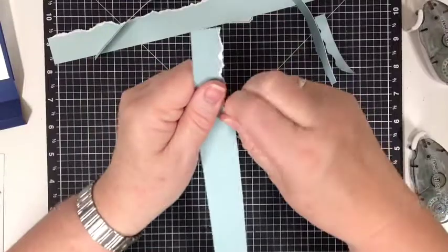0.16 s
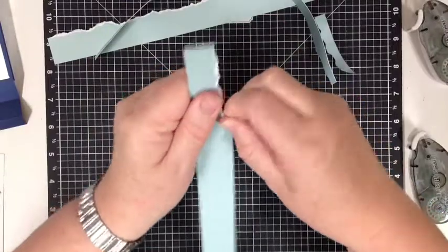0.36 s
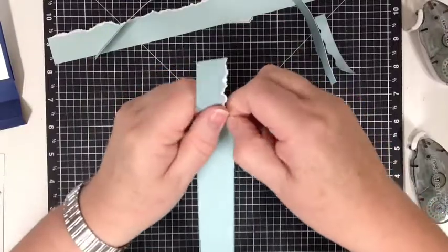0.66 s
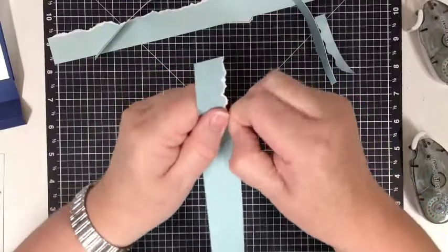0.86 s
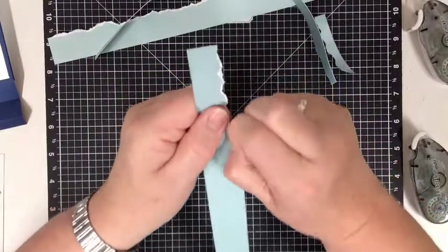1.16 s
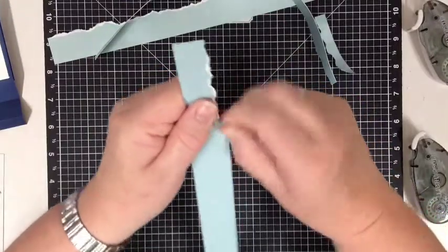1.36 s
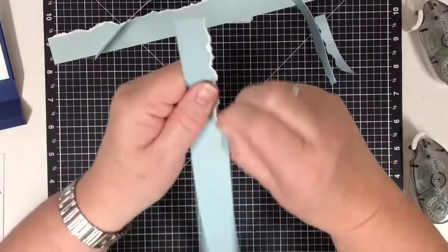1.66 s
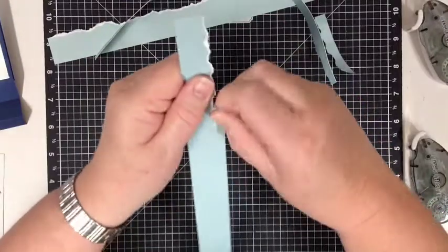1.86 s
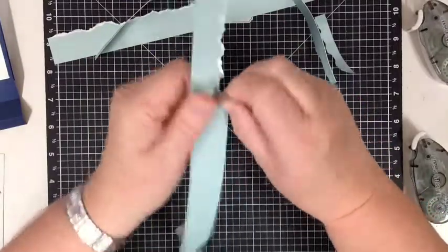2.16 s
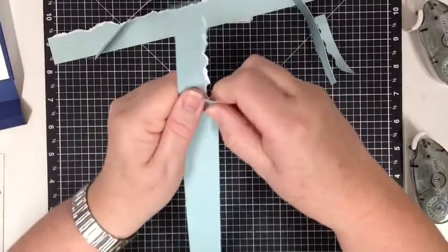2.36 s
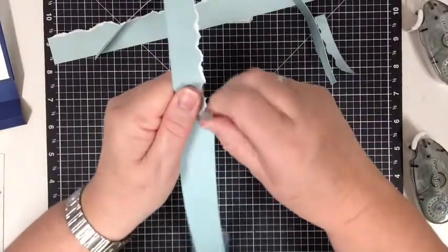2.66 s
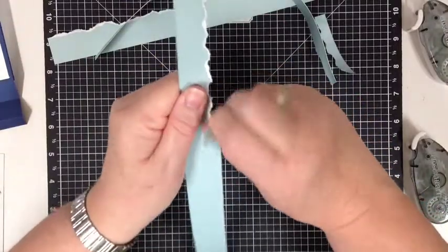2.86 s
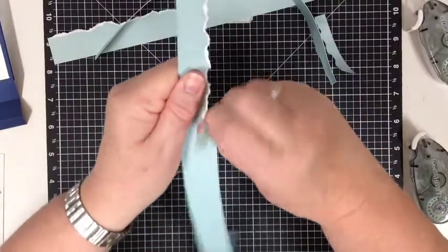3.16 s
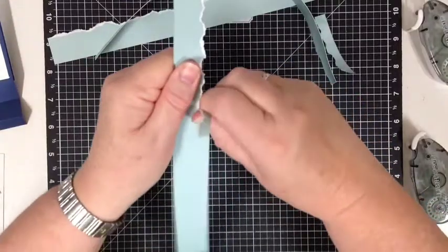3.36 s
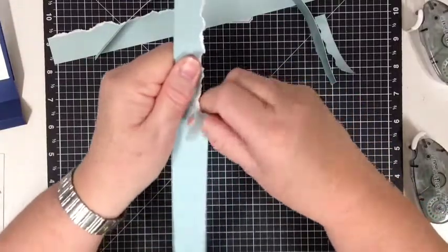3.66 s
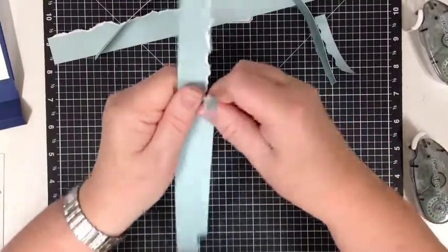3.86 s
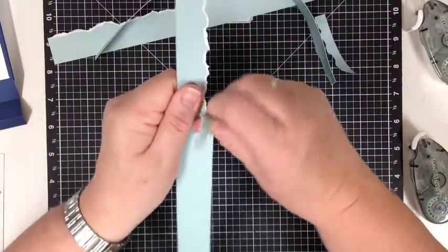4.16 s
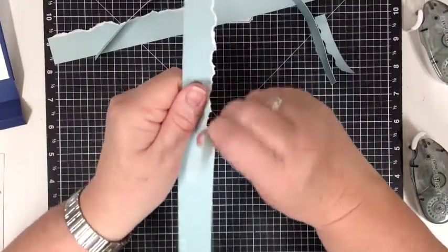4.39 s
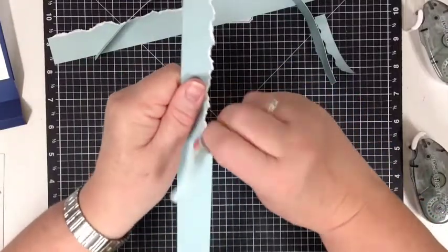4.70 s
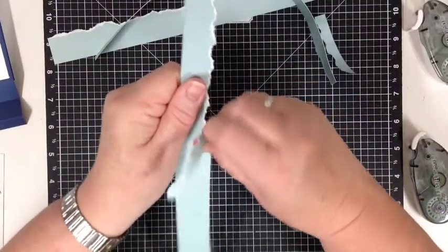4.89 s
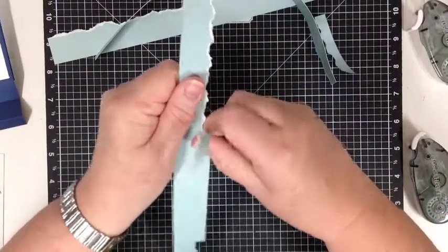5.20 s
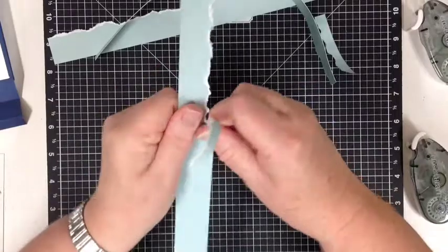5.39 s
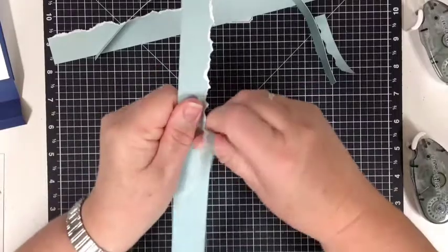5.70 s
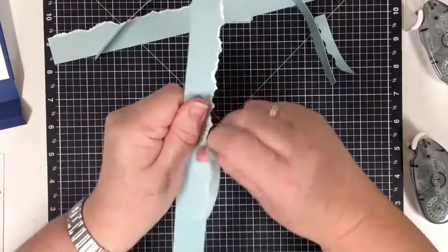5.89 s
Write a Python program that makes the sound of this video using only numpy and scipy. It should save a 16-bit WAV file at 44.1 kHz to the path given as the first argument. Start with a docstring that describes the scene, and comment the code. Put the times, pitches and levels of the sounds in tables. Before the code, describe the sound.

Close to the microphone in a small, fairly dry room, hands tear a stiff strip of card bit by bit. After a second of faint skin rubs and ticks, short crackling rips begin, each a tiny burst topped by sharp snaps. Between them fingers slide and tap softly while regripping. Later tears come regularly and grow snappier, over faint hiss and hum.

```python
"""Two hands tear a ragged edge along a strip of cardstock, a pinch at a time, over a craft table in a small room.
Each tear is a burst of random tiny clicks (breaking fibres), coloured by the stiff strip, with sharp snaps added.
Fingers slide along the card with a finer hiss (one brief small tear is made the same way) and tap it as short
damped tones; the bent strip ticks at random. Short noise echoes make the room.
Under it all lie faint filtered noise, a wavering hum and a low drone.
"""
import sys
import numpy as np
from scipy import signal
from scipy.fft import rfft, irfft
from scipy.io import wavfile
from scipy.ndimage import uniform_filter1d

SR = 44100
rng = np.random.default_rng(int(sys.argv[2]) if len(sys.argv) > 2 else 0)


def digitize_waveform(pressure):
    """Quantize a signal to 16-bit integers and store it at the path in sys.argv[1].

    Rows of a 2-D input are taken as channels; values are limited to [-1, 1].
    """
    field = np.atleast_2d(pressure).T
    bounded = np.clip(field, -1, 1)
    quanta = np.round(bounded * 32767).astype(np.int16)
    wavfile.write(sys.argv[1], SR, quanta)


N = 266364  # length of the scene [samples]
TOP_HZ = 15450  # upper limit of the sound


def tearing(gain_db=1.78):
    """The tear front runs through the fibres: coarse, bursty crackle."""
    # tears: (start [s], length [s], final crackle level before gain_db [dB], build-up [dB],
    # body relative to crackle [dB], treble tilt [dB per octave], low flex [dB], flap resonance [Hz])
    tears = [ (1.246, 0.066, -55.5, -9, -16, 5, -7, 1280),
             (1.568, 0.09, -34.5, 19.5, -16, -1.5, -1.5, 1440), (1.97, 0.039, -38, 2, -15, 1.5, 1.5, 1190),
             (2.452, 0.13, -43, 12.5, -17, -.5, 3.5, 1240), (2.861, 0.048, -43, 4.5, -8, 2, -1, 2480),
             (3.137, 0.066, -33.5, 10, -8, 1.5, 4, 2210), (3.444, 0.045, -38.5, 10, -6.5, -.5, 1, 1660),
             (4.016, 0.067, -47.5, -2, -16.5, 3, 10.5, 1970), (4.322, 0.057, -35.5, 3, -7.5, 2, -0.5, 2300),
             (4.637, 0.083, -39, 7, -7, 1.5, 1.5, 2300), (4.94, 0.065, -41, -7.5, -8, 1.5, 4, 1400),
             (5.534, 0.054, -47, -8, -15.5, 3.5, 5, 2740), (5.827, 0.07, -37, -1, -9.5, 0.5, -1.5, 1840), ]
    # broad colour of tearing: (frequency [Hz], level [dB])
    tear_colour = [(70, -52), (230, -24), (330, -13), (520, -10), (720, -9), (850, -14), (1250, -11),
                   (2200, -5), (3500, -3.5), (5000, -1), (8000, 0), (11000, .5), (13500, 0), (15500, -3)]
    out = np.zeros(N)
    grain = dict(per_s=2800, spread_db=3.9, burst_db=2.2, burst_s=.003, hiss=.42)
    for row in tears:
        start_s, sound = stroke(row, attack_db_per_s=865, release_db_per_s=560, colour=tear_colour,
                                strip_share=0.97, scatter_db=3.0, **grain)
        add(out, start_s, sound)
    return out * undb(gain_db)


def snapping(gain_db=-1.0, cycles=0.76, crumble=0.38, crumble_s=0.0019):
    """A bundle lets go with one short crack, its neighbours crumble after it, and the strip rings."""
    # fibre bundles that snap and edges that flick:
    # (time [s], level before gain_db [dB], centre frequency [Hz])
    snaps = [(0.043, -46, 4100), (.8002, -60, 2500), (1.182, -49, 9500), (1.248, -45.5, 10700),
             (1.2722, -44, 12200), (1.6283, -27.5, 7100), (1.659, -50, 6550), (1.761, -45, 2600),
             (2.094, -37.5, 3600), (2.2258, -35.5, 6700), (2.4227, -47.5, 8900), (2.4955, -42, 9100),
             (2.8013, -40.5, 9100), (2.8446, -37.5, 9600), (2.8752, -40, 9100), (2.9285, -37.5, 6600),
             (2.9993, -48, 3700), (3.1328, -40, 9700), (3.1859, -27, 7400), (3.194, -30, 7100),
             (3.207, -25, 5800), (3.3057, -52, 3900), (3.4252, -43, 5450), (3.5166, -32, 8300),
             (4.0118, -40, 10600), (4.0565, -25.5, 10700), (4.0873, -42, 8540), (4.1826, -51, 8400),
             (4.298, -43, 6300), (4.3252, -30, 5800), (4.3878, -26.5, 6300), (4.4792, -52.5, 3860),
             (4.594, -43.5, 11200), (4.614, -50, 8500), (4.6409, -34.5, 2800), (4.6736, -28.5, 3800),
             (4.9188, -33, 5940), (4.9391, -27, 4600), (4.971, -23.5, 5550), (5.0108, -32, 7200),
             (5.247, -43, 3040), (5.5282, -27.5, 8700), (5.8061, -29, 10600), (5.8143, -20, 3520),
             (5.8399, -30, 6900), (5.8954, -25, 6860), (5.9729, -46, 7200)]
    out = np.zeros(N)
    t = np.arange(SR // 50) / SR
    strip = ring(strip_db(freqs(2048)))
    for s, db, hz in snaps:
        # the crack fades over a fixed fraction of a cycle, so high cracks are shorter
        crack = np.exp(-t * hz / cycles) * np.cos(2 * np.pi * hz * t)
        noise = band(rng.standard_normal(len(t)), hz / 3, hz * 2, order=1)
        after = unit(noise) * np.exp(-t / crumble_s)
        snap = signal.fftconvolve(crack + crumble * after, strip)
        # thin bundles snap high and move too little card to make any bass
        snap = band(snap, hz / 4, 17000, order=2)
        # the level is set by the first millisecond
        add(out, s, snap / np.std(snap[:SR // 1000]) * undb(db + gain_db))
    return out


def sliding(gain_db=0.74):
    """Skin rubs along the card, with one brief small tear: much finer grains that merge into an even hiss."""
    # slides to a new grip, and one brief small tear at 2.227 s:
    # (start [s], length [s], final hiss level before gain_db [dB], build-up [dB],
    # body relative to hiss [dB], treble tilt [dB per octave], low flex [dB], flap resonance [Hz])
    slides = [ (0.02, 0.023, -55.5, -8, -4, -2.5, -1, 3500), (0.344, 0.056, -53.5, 4.5, -6, -4, 6, 1380),
              (0.451, 0.1, -52.5, -2, -21, 0, -16, 1130), (0.602, .025, -61.5, -0.5, -11, 0, -7, 1130),
              (0.693, 0.04, -52.5, -4, -10.5, -1, -17, 2950), (0.837, 0.13, -64, 1.5, -8, -4.5, 10, 1150),
              (1.042, 0.0063, -56.5, -4.5, -12.5, 0.5, -8, 1580),
              (1.096, 0.037, -50.5, 4, -19, 5.5, -4, 1580),
              (1.384, 0.0051, -55.5, -4, -12.5, -2.5, 11, 1420),
              (1.431, 0.016, -50, 8, -11.5, -2.5, 7, 1410), (1.53, 0.079, -51, 1.5, -12, 2.5, 3, 1370),
              (1.766, 0.018, -44, 4, -6, -5, -8, 1590), (1.889, 0.078, -53.5, -3, -8, 2, -15, 1540),
              (2.069, 0.14, -53, 4.5, -13.5, -2, 1, 1120), (2.227, 0.013, -41, 0.5, -3.5, 0, -3, 1260),
              (2.276, 0.025, -54.5, 3, -11, -10, 8.5, 1250), (2.348, 0.0092, -53, 1, -10, -3, 10, 1240),
              (2.695, 0.023, -44, 7, -12, -3.5, 3, 3540), (2.803, 0.009, -44.5, -0.5, -22, 1, -12, 3560),
              (3.003, 0.039, -52.5, 4, -7, -2.5, 0, 2300), (3.066, 0.046, -60.5, -4, -4.5, 2, 0, 1300),
              (3.312, 0.042, -54.5, 2.5, -5, -1, 9, 2250), (3.388, 0.0064, -48.5, -3.5, -17, 2.5, 3, 1580),
              (3.617, 0.042, -48.5, -0.5, -4.5, -2, 0.5, 2180),
              (3.742, 0.13, -45.5, 9, -14, -2.5, 5.5, 1940), (3.973, 0.063, -52.5, 0, -28, 0, 17, 1950),
              (4.202, 0.032, -52, 11, -9.5, -3, 8, 2510), (4.485, 0.02, -55.5, 0.5, -8.5, -4, 14, 2350),
              (4.533, 0.011, -47.5, -1, -14, 2, 2, 2360), (4.8, .062, -55, 6, -4.5, -2.5, 7.5, 1720),
              (5.072, 0.043, -59.5, -6, -10.5, -2, 1, 2300), (5.146, 0.029, -49.5, 3, -6.5, -3.5, 2, 2170),
              (5.26, 0.13, -39.5, 8.5, -16, 0.5, 6, 4860), (5.464, 0.0096, -60, -3.5, -14, -2.5, 17, 2720),
              (5.701, 0.0079, -39.5, 2.5, -7.5, -5, 3.5, 2140), (5.724, 0.018, -51, 13, -22, -6, 3, 2170),
              (5.98, 0.065, -58.5, -2.5, -6.5, -4, 6, 5740), ]
    # broad colour of sliding: (frequency [Hz], level [dB])
    slide_colour = [(70, -40), (220, -24.5), (340, -10), (520, -9.5), (850, -18), (1300, -9.5),
                    (2200, -6.5), (3500, -3), (8000, 3.5), (15500, 6)]
    out = np.zeros(N)
    grain = dict(per_s=12000, spread_db=2.8, burst_db=1.2, burst_s=.007, hiss=.8)
    for row in slides:
        start_s, sound = stroke(row, attack_db_per_s=817, release_db_per_s=421, colour=slide_colour,
                                strip_share=0.46, scatter_db=2.5, **grain)
        add(out, start_s, sound)
    return out * undb(gain_db)


def stroke(row, attack_db_per_s, release_db_per_s, colour, strip_share, scatter_db, **grain):
    """One hand movement: grains sound through the strip, with its own flap pitch and fine ripple."""
    s, length, level_db, build_db, body_db, tilt_db, flex_db, flap_hz = row
    first, last = int(max(s - .05, 0) * SR), int((s + length + .12) * SR)
    t = np.arange(first, last) / SR

    # the level sets in, changes steadily while the hand moves, and dies away when it stops
    effort_db = np.interp(t, [s, s + length], [level_db - build_db, level_db])
    effort_db -= attack_db_per_s * np.maximum(s - t, 0)
    effort_db -= release_db_per_s * np.maximum(t - s - length, 0)

    hz = freqs(2048)
    db = colour_db(colour, hz)
    db += tilt_db * np.log2(np.maximum(hz / 3500, 1))  # only above 3500 Hz
    db += flex_db / (1 + (hz / 850) ** 6)  # mostly below 850 Hz
    db += strip_share * strip_db(hz)
    db += 5 / (1 + (np.log(hz / flap_hz) / .11) ** 2)  # 5 dB lift at the resonance of the free flap
    # reflections off the hands ripple the spectrum finely
    db += scatter_db * wander(np.log(hz + 1500), .018)

    grains = fibres(np.arange(SR // 2) / SR, **grain)
    sound = signal.fftconvolve(grains, ring(db))[:len(t)]
    # the treble comes straight from the fibres, the body from the bending card
    low = irfft(rfft(sound) / (1 + (freqs(len(t)) / 3300) ** 8), len(t))
    body = low / np.std(band(low, 900, 3300))
    treble = unit(sound - low)
    return t[0], (treble + body * undb(body_db)) * undb(effort_db)


def fibres(t, per_s, spread_db, burst_db, burst_s, hiss):
    """Tiny breaks of very uneven size; they come in bursts as the card catches and gives."""
    n = len(t)
    size = undb(spread_db * np.minimum(rng.exponential(size=n), 4))
    happens = rng.random(n) < per_s / SR
    breaks = happens * size * rng.choice([-1, 1], n)
    grains = unit(breaks) + hiss * rng.standard_normal(n)
    force = grains * undb(burst_db * wander(t, burst_s))
    # the hand's pull sets the mean power, however it is split between bursts
    power = uniform_filter1d(force ** 2, SR // 30)
    return force / np.sqrt(power + 1e-9)


def strip_db(hz):
    """Lift of the stiff strip's resonances at each frequency, in dB."""
    # resonances of the held strip over the table: (frequency [Hz], width [Hz], full lift [dB])
    resonances = [(660, 150, 6), (1030, 100, 3), (1470, 130, 2), (1850, 170, 6), (2350, 220, 6),
                  (2940, 160, 3), (4380, 400, 5), (5110, 250, 3), (6330, 300, 4), (7800, 400, 2)]
    return sum(lift / (1 + (2 * (hz - f) / width) ** 2) for f, width, lift in resonances)


def tapping(gain_db=-1, decay_s=0.0019, push_s=0.00046, thud=0.25, thud_s=0.0052):
    """A soft fingertip bends the card: a quickly damped tone and a dull flutter."""
    # fingers bump the card: (time [s], level before gain_db [dB], pitch [Hz])
    taps = [(.025, -47, 614), (.49, -55, 1160), (0.723, -52, 1440), (2.094, -53, 460), (2.365, -46, 1180),
            (2.74, -49.5, 1310), (3.054, -47, 1380), (3.303, -46.5, 623), (3.442, -45, 446),
            (3.62, -50.5, 460), (4.478, -50, 470), (5.166, -50, 710), (5.692, -42.5, 466),
            (5.972, -43, 460), (5.983, -51, 634)]
    out = np.zeros(N)
    t = np.arange(SR // 10) / SR
    for s, db, hz in taps:
        flex = np.sin(2 * np.pi * hz * t) * np.exp(-t / decay_s)
        noise = band(rng.standard_normal(len(t)), hz * .5, hz * 1.4, order=2)
        flutter = unit(noise) * np.exp(-t / thud_s)
        soft_start = 1 - np.exp(-t / push_s)
        tap = band((flex + thud * flutter) * soft_start, 160, 4000, order=2)
        # the level is set by the peak, as for a sine of that rms
        add(out, s, tap / np.abs(tap).max() * np.sqrt(2) * undb(db + gain_db))
    return out


def crinkling(per_s=70, level_db=-68, spread_db=3.0, decay_s=0.0031):
    """The bent strip ticks faintly at random times: short noise bursts of random pitch and size."""
    out = np.zeros(N)
    t = np.arange(SR // 100) / SR
    for when, size, pitch in rng.random((int(per_s * N / SR), 3)):
        hz = 1300 * 6 ** pitch  # 1300 to 7800 Hz
        noise = band(rng.standard_normal(len(t)), hz / 2, hz * 2, order=1)
        tick = unit(noise) * np.exp(-t / decay_s)
        extra_db = spread_db * min(-np.log(1 - size), 3)
        add(out, when * N / SR, tick * undb(level_db + extra_db))
    return out


def room(x, tail_db=-15, t60_s=0.093):
    """The table and the things on it scatter the sound back at once, then the room adds a short tail."""
    t = np.arange(SR // 3) / SR
    early = rng.standard_normal(len(t)) * np.exp(-t / .006) * (t > .001)
    early *= undb(-12) / np.linalg.norm(early)
    tail = band(rng.standard_normal(len(t)), 110, 26000, order=1)  # band() lowers the top limit
    tail *= undb(-60 * t / t60_s) * (t > .005)
    response = early + undb(tail_db) * tail / np.linalg.norm(tail)
    response[0] += 1  # the direct sound
    return signal.fftconvolve(x, response / np.linalg.norm(response))[:N]


def background(hum_hz=142, hum_db=-80, drone_hz=115, waver_db=1):
    """Even hiss and low room noise, a slightly wavering hum, and a lower drone that swells twice."""
    # broad colour of the noise: (frequency [Hz], relative level [dB])
    noise_colour = [(25, -15), (50, -11), (90, -9.5), (125, 2), (200, 7), (340, 9), (520, 4.5), (900, 1),
                    (2000, -2.5), (5000, -5.5), (12000, -2.5), (15500, -8.5)]
    # the low drone comes and goes: (time [s], level [dB])
    drone_levels = [(0, -110), (1.75, -94), (1.9, -76), (2.05, -76), (2.17, -117), (4.35, -94),
                    (4.5, -78.5), (4.8, -75), (4.92, -88), (6.04, -90)]
    t, hz = np.arange(N) / SR, freqs(N)
    spectrum = rfft(rng.standard_normal(N)) * undb(colour_db(noise_colour, hz))
    noise = irfft(spectrum * (hz < TOP_HZ), N)
    noise = unit(noise) * undb(-65.5 + .5 * wander(t, 0.042))

    # small phase wanders keep the two tones from being perfectly pure
    hum = np.sin(2 * np.pi * hum_hz * t + 1.2 * wander(t, 0.18))
    hum *= undb(hum_db + waver_db * wander(t, 0.18))
    drone = np.sin(2 * np.pi * drone_hz * t + 0.25 * wander(t, 0.3))
    drone *= undb(np.interp(t, *np.transpose(drone_levels)))
    return noise + np.sqrt(2) * (hum + drone)  # sqrt(2) turns the tone levels into rms levels


def undb(db):
    """Turn decibels into gain."""
    return 10 ** (np.asarray(db) / 20)


def unit(x):
    """Scale to rms 1."""
    return x / np.sqrt(np.mean(x ** 2) + 1e-20)


def freqs(n):
    """Frequencies in Hz of an n-sample spectrum, never below 1."""
    return np.maximum(np.arange(n // 2 + 1) * SR / n, 1)


def colour_db(points, hz):
    """Read (Hz, dB) points on a log-frequency axis."""
    f, db = np.transpose(points)
    return np.interp(np.log(hz), np.log(f), db)


def wander(x, step):
    """Random values a step apart along x, joined by straight lines; spread near 1."""
    k = (x - x.min()) / step
    return np.interp(k, np.arange(4096), rng.standard_normal(4096)) * np.sqrt(3 / 2)


def ring(db, size=2048):
    """Impulse response with the given dB gain at each frequency, sounding only after the impulse."""
    cepstrum = irfft(db * np.log(10) / 20)
    # doubling the first half and clearing the second makes the response minimum phase
    cepstrum[1:size // 2] *= 2
    cepstrum[size // 2 + 1:] = 0
    return irfft(np.exp(rfft(cepstrum)))


def band(x, lo_hz, hi_hz, order=3):
    """Keep the frequencies between two limits (Butterworth band-pass)."""
    limits = [lo_hz, min(hi_hz, SR / 2 - 100)]
    return signal.sosfilt(signal.butter(order, limits, "band", fs=SR, output="sos"), x)


def add(out, s, sound):
    """Mix a sound in at time s."""
    i = max(int(s * SR), 0)
    out[i:i + len(sound)] += sound[:max(N - i, 0)]


def scene():
    """Card and fingers in the room, over the background."""
    card = tearing() + snapping() + sliding() + tapping() + crinkling()
    return (room(card) + background())[None]


def record(dry):
    """A steep low-pass cuts the top."""
    return signal.sosfilt(signal.ellip(10, .2, 70, TOP_HZ, fs=SR, output="sos"), dry)


dry = scene()
out = record(dry)
digitize_waveform(out)
```